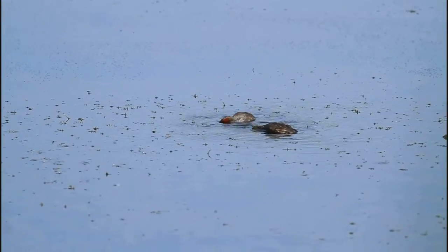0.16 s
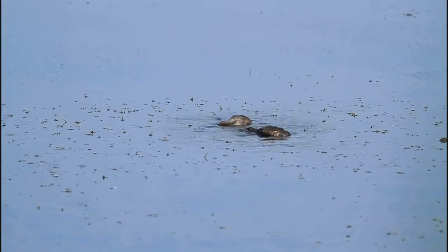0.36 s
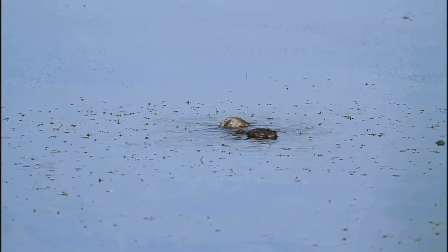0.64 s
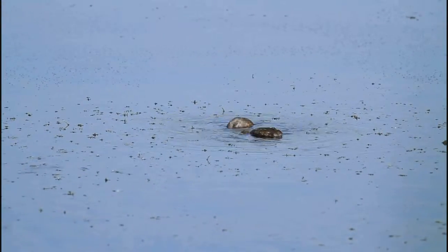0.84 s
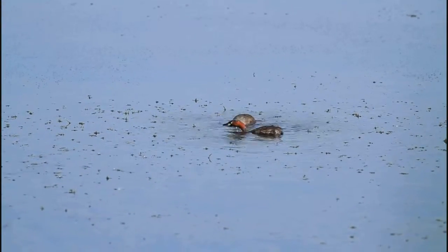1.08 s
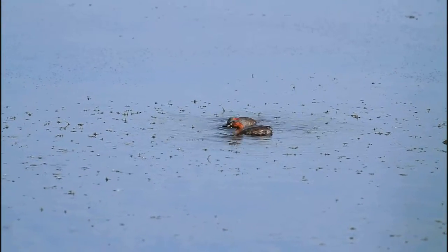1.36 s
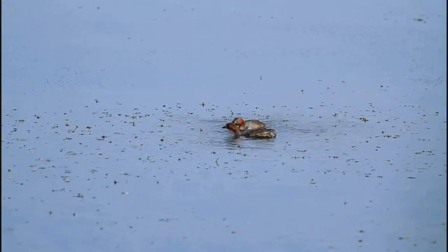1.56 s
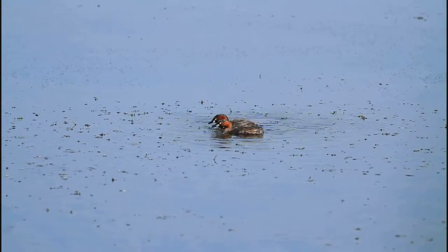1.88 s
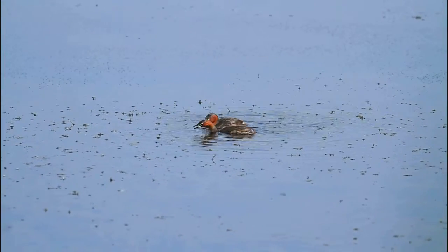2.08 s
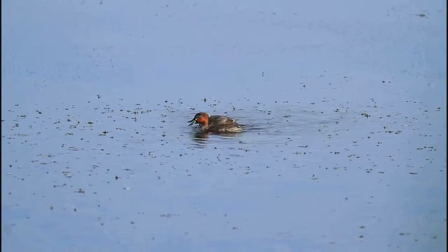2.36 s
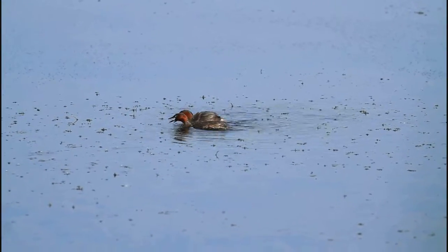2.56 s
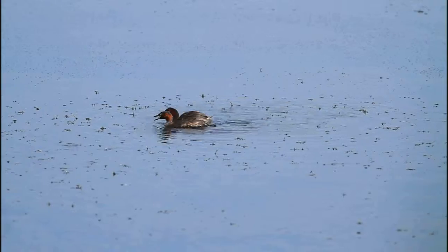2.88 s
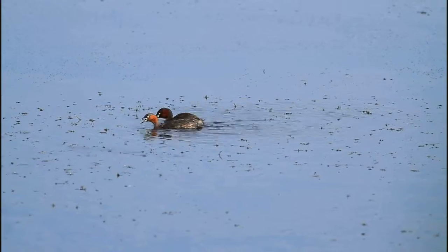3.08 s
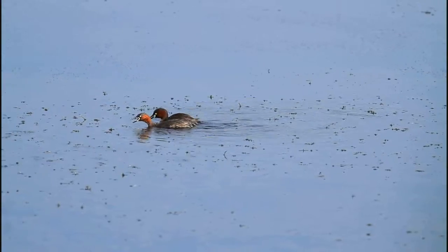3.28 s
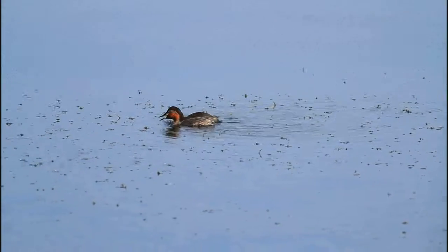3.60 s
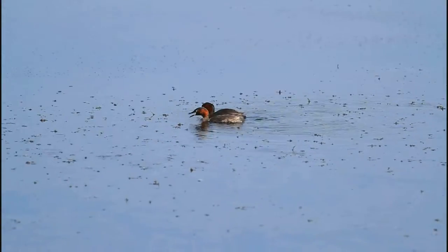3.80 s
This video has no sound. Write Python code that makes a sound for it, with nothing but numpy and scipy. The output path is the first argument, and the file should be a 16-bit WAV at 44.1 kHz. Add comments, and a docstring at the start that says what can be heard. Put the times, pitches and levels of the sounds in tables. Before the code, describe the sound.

Two little grebes burst into a fast rattling duet trill after quiet distant bird whistles.

```python
"""Two little grebes trill in a duet on a calm pond: short arched notes in alternation, led in by soft peeps.
Each note is a stack of harmonics on an arch of pitch, coloured by the throat. The lower bird is clean;
the higher one is rasped by a second tone, or flips up into a thin squeak.
Far birds whistle as gliding sines, a distant engine hums as steady tones under coloured noise for the air,
and a few dull bumps are short low pulses. Decaying noise makes the diffuse answer of the banks."""
import sys
import numpy as np
from scipy import signal
from scipy.fft import rfft, irfft, next_fast_len
from scipy.io import wavfile
from scipy.ndimage import map_coordinates

SR = 44100
rng = np.random.default_rng(int(sys.argv[2]) if len(sys.argv) > 2 else 0)


def int16_out(signal):
    """Quantize to a 16-bit WAV file."""
    q = np.round(np.clip(np.atleast_2d(signal).T, -1, 1) * 32767)
    wavfile.write(sys.argv[1], SR, q.astype(np.int16))


N = 173754
TOP_HZ = 15750  # band limit
TRILL_START_S = 2.1
BLUR_RAD = 0.58  # phase noise that frays the treble overtones

# treble level of both birds through the trill, before each note's own changes: t/s, level/dB
TREBLE_COURSE = [(2.05, -40.5), (2.2, -32.5), (2.4, -29.5), (2.52, -36), (2.9, -36), (3.65, -33.5),
                 (3.85, -39.5)]


def amp(db):
    """Decibels to gain."""
    return 10 ** (np.asarray(db) / 20)


def unit(x):
    """Scaled to rms 1."""
    return x / np.sqrt(np.mean(x ** 2) + 1e-20)


def along(points, hz):
    """Reads (Hz, value) points on a log frequency axis."""
    f, v = np.transpose(points)
    return np.interp(np.log(hz + 1), np.log(f + 1), v)


def wobble(rate, size=N):
    """A smooth random curve of about rms 1, with rate knots a second."""
    knots = rng.standard_normal(size + 4)
    position = np.arange(size) * rate / SR
    return map_coordinates(knots, [position], order=3, prefilter=False) * np.sqrt(2)


def filtered(x, response):
    """Multiplies the spectrum of x by a response of frequency."""
    m = next_fast_len(N + SR // 2)
    hz = np.fft.rfftfreq(m, 1 / SR)
    return irfft(rfft(x, m) * response(hz), m)[:N]


def noise(spectrum):
    """Coloured noise of rms 1."""
    return unit(filtered(rng.standard_normal(N), lambda hz: amp(along(spectrum, hz))))


def add(track, s, sound):
    """Mixes a sound in, centred on time s."""
    i = round(s * SR) - len(sound) // 2
    track[i:i + len(sound)] += sound[:max(N - i, 0)]


def background():
    """Coloured noise for open air, an engine's fading hum, a thin insect-like band and a faint rustle."""
    # engine partials, rms level at the start: f/Hz, level/dB
    hum_partials = [(99, -42), (198.5, -49), (231.3, -51.5), (265, -53.5), (296.5, -51)]
    # colour of the air, relative: f/Hz, level/dB
    air_colour = [(25, -20), (45, -3.5), (125, -2.5), (200, -8), (330, -5), (500, -17.5), (800, -14),
                  (1300, -21.5), (3200, -25.5), (3700, -32), (4600, -29), (5600, -34), (15500, -40.5)]
    # colour of the thin steady band, relative: f/Hz, level/dB
    insect_colour = [(2750, -22), (3320, -4), (3700, -35.5)]
    hum_fade_db_per_s = 2.5
    rustle_s, rustle_db = 1.7, -54
    t = np.arange(N) / SR
    hum = np.zeros(N)
    for hz, db in hum_partials:
        level_db = db - hum_fade_db_per_s * t + 0.54 * wobble(6.92)
        hum += np.sqrt(2) * amp(level_db) * np.sin(2 * np.pi * hz * t + 0.51 * wobble(8.24))
    drift_db = .5 * wobble(10)
    air = amp(-42 + drift_db) * noise(air_colour)
    rustle = amp(rustle_db) * np.exp(-((t - rustle_s) / .012) ** 2) * rng.standard_normal(N)
    insects = amp(-61.0) * noise(insect_colour)
    return hum + air + rustle + insects


def bumps():
    """Dull bumps as short low-pitched pulses, and one harder knock as a decaying burst of noise."""
    # dull bumps: t/s, peak level/dB
    bump_rows = [(1.843, -29), (1.883, -20), (2.794, -24), (2.981, -27), (3.171, -28), (3.478, -30)]
    # hard knock, rms level at its onset: t/s, level/dB
    knock_rows = [(2.789, -26.5)]
    bump_hz = 103
    out, t = np.zeros(N), np.arange(-SR // 10, SR // 10) / SR
    pulse = np.cos(2 * np.pi * bump_hz * t) * np.exp(-np.abs(t * bump_hz / 0.55) ** 3.1)
    for s, db in bump_rows:
        add(out, s, amp(db) * pulse)
    for s, db in knock_rows:
        age = np.arange(N) / SR - s
        decay = (age > 0) * amp(-60 * np.abs(age) / 0.036)  # 60 dB down in 36 ms
        out += amp(db) * decay * noise([(150, 1), (450, -3.5), (900, -32), (3000, -48)])
    return out


def far_birds():
    """Slurred whistles: gliding sines with a weak undertone at half the pitch and an overtone at 3/2."""
    # one table per whistle or chirp, level of the main tone: t/s, f/Hz, level/dB
    whistle_paths = [
        [(0.0, 4400, -53), (.05, 5140, -50), (.1, 4145, -48.5), (.16, 3603, -45.5), (.19, 3985, -48.5),
         (.22, 3630, -60)],
        [(.52, 4200, -60), (.61, 5300, -54.5), (.675, 7180, -57)],
        [(1.015, 3900, -55), (1.04, 5000, -48), (1.065, 4950, -50), (1.09, 4220, -49), (1.14, 3800, -56),
         (1.205, 3850, -53.5), (1.25, 3500, -54)],
        [(1.727, 3620, -56), (1.747, 3280, -57)],
        [(1.922, 3170, -47), (1.95, 3500, -51)],
    ]
    out, t = np.zeros(N), np.arange(N) / SR
    for rows in whistle_paths:
        s, hz, db = np.transpose(rows)
        pitch = np.interp(t, s, hz) * (1 + 0.012 * wobble(300))
        phase = 2 * np.pi * np.cumsum(pitch) / SR
        gate = np.clip(np.minimum(t - s[0], s[-1] - t) / 0.0051, 0, 1)
        flutter_db = 3 * wobble(90)
        tone = np.sin(phase) + amp(-7.5) * np.sin(phase / 2) + amp(-17) * np.sin(3 * phase / 2)
        out += gate * amp(np.interp(t, s, db) + flutter_db) * tone
    return out


def bank(x, delay_s):
    """The diffuse answer of the banks: x convolved with decaying noise; the lows die first."""
    # time to decay by 60 dB: f/Hz, t60/s
    decay_times = [(300, 0.13), (3000, 0.52), (6000, 0.59), (14000, 0.49)]
    hz, t, z = signal.stft(rng.standard_normal(SR // 2), SR, nperseg=256)
    decay = amp(-60 * t / along(decay_times, hz)[:, None])
    tail = signal.istft(z * decay, SR, nperseg=256)[1]
    delayed = np.pad(x, (int(delay_s * SR), 0))
    return signal.fftconvolve(delayed, tail / np.linalg.norm(tail))[:N]


def note(hz, level_db, upper_db, treble_db, shape, jitter, second_db=-100, mid_treble_db=0,
         glide=0, swell_db=0, fade_db_per_s=0, top_shift=1, blur=0):
    """One arch of pitch: its harmonics sweep through the throat's resonances; a second tone makes it rasp."""
    # throat response of both birds: f/Hz, level/dB
    throat = [(800, -9.5), (1450, -11), (1800, -7.5), (2300, 1), (2900, -3), (3400, 1.5), (4200, 5.5),
              (4650, -2.5), (5300, -15.5), (6800, -17), (8000, -24.5), (10300, -26), (12400, -17.5),
              (14000, -22), (15500, -43)]
    # where the upper resonance is lifted: f/Hz, weight
    upper_zone = [(3100, 0), (3700, 1), (5050, 1), (5500, 0)]
    # where the treble settings take hold: f/Hz, weight
    treble_zone = [(5050, 0), (5500, 1)]
    # where the top resonance is retuned: f/Hz, weight
    top_zone = [(8000, 0), (11000, 1)]
    arch_power, skew = 2.42, 0.352  # roundness of the arch; its random lopsidedness
    scatter_db, sag_loss_db = 3, 8  # treble overtone balance per note; loss per unit of pitch sag
    swell_s, blur_rate = 0.0058, 1394  # width of the crest's swell; phase noise knots a second
    # second tone: ratio to the pitch, scatter of that ratio, how the two modulate each other
    second_ratio, second_spread, second_depth, second_pull = 2.71, 0.0617, 0.1, 0.17

    rise, fall, drop_in, drop_out, before, after = shape
    t = np.arange(-SR // 32, SR // 32) / SR
    size = len(t)
    lean = np.exp(skew * rng.uniform(-1.043, 1))
    sag_in = lean * drop_in * np.abs(t / rise) ** arch_power
    sag_out = drop_out / lean * np.abs(t / fall) ** arch_power
    sag = np.minimum(np.where(t < 0, sag_in, sag_out), .5)
    f0 = hz * np.exp(glide * t - sag + jitter * wobble(1454, size))

    swell = swell_db * (np.exp(-(t / swell_s) ** 2) - .7)
    effort_db = swell - sag_loss_db * sag - fade_db_per_s * t
    gate = amp(effort_db) / (1 + np.abs(t / np.where(t < 0, before, after)) ** 8)

    phase = 2 * np.pi * (np.cumsum(f0) / SR + rng.random())
    ratio = second_ratio + second_spread * rng.standard_normal()
    second = ratio * phase + 2 * np.pi * rng.random() + .5 * wobble(424, size)

    k = np.arange(1, 15)[:, None]  # harmonic numbers
    f = k * f0
    treble, top = along(treble_zone, f), along(top_zone, f)
    lifts = upper_db * along(upper_zone, f)
    lifts += (treble_db + scatter_db * rng.standard_normal(k.shape)) * treble
    lifts += mid_treble_db * (treble - top)
    gains = amp(along(throat, f / top_shift ** top) + lifts) * (f < TOP_HZ)

    beat = np.sin(3 * phase - second)
    pulled = phase + second_pull * min(amp(second_db), 1) * beat
    smear = blur * treble * np.array([wobble(blur_rate, size) for _ in k])
    stack = (gains * np.sin(k * pulled + smear)).sum(0)
    side = amp(second_db) * np.sin(second) * (1 + second_depth * np.cos(phase))
    flutter_db = 1.5 * wobble(400, size)
    return np.sqrt(2) * amp(level_db + flutter_db) * gate * (stack + side)


def peeps():
    """Soft gliding notes around the start of the trill, one with a bright flick."""
    # middle, pitch, half length, level before the throat, brightness, relative glide:
    # t/s, f/Hz, half/s, level/dB, bright/dB, glide/(1/s)
    peep_rows = [(1.82, 2120, 0.01, -45.5, -11, -5.5), (1.870, 1990, 0.015, -40, -10, -1),
                 (1.9, 2243, 0.008, -39, -3.5, 2.5), (1.911, 2518, 0.0053, -42.5, 10.5, 0.5),
                 (1.93, 2124, 0.011, -40, -16, -4.5), (2.074, 2060, .004, -34.5, -12, 2)]
    out = np.zeros(N)
    for s, hz, half, db, bright_db, glide in peep_rows:
        shape = (half, half, .03, .03, half, half)
        add(out, s, note(hz, db, bright_db - 9, bright_db, shape, jitter=0.011, glide=glide))
    return out


def higher_grebe():
    """Answers in the gaps, with a rasping two-tone arch or a run-up that breaks into a squeak."""
    # crest, pitch, level before the throat, lift of the upper resonance, second tone relative to the level:
    # t/s, f/Hz, level/dB, upper/dB, second/dB
    rasp_rows = [(2.268,1535,-36,3,5.5), (2.327,1601,-35,5.5,6), (2.386,1623,-37.5,10.5,0),
                 (2.445,1621,-35.5,8,0), (2.502,1596,-40.5,9,-2), (2.561,1540,-35,5,2),
                 (2.619,1620,-36,-8,2.5), (2.909,1558,-37.5,7,2), (2.971,1581,-38,10,-15),
                 (3.027,1582,-36,4,1.5), (3.085,1562,-34,2,-1), (3.144,1513,-33,-1.5,-2),
                 (3.198,1532,-35,-4,0.5), (3.436,1513,-34,-4.5,-2.5), (3.498,1492,-31.5,-3,-7),
                 (3.558,1516,-33.5,-2,-5), (3.614,1506,-33.5,-2.5,0), (3.675,1537,-34.5,1,4),
                 (3.736,1540,-35,0.5,-3), (3.796,1500,-31,0,-7), (3.856,1524,-33.5,-4,-4),
                 (3.915,1535,-33,0,0)]
    # notes in the top register, level before the throat: t/s, f/Hz, level/dB, upper/dB
    squeak_rows = [(2.022,2340,-42,-4), (2.084,2480,-43,16), (2.151,2460,-36,11), (2.210,2466,-34.5,8.5),
                   (2.684,2485,-36.5,7), (2.739,2453,-36,9.5), (2.794,2428,-37.5,11.5),
                   (2.858,2484,-35.5,7), (3.211,2390,-40.5,-12), (3.263,2340,-35,-1),
                   (3.322,2320,-34.5,4.5), (3.383,2330,-34,4)]
    # arches, each: rise/s, fall/s, log pitch drop at start and end (before the random lean),
    # time before/s and after/s the crest where the gate halves
    rasp_shape = (0.014, 0.0151, 0.17, 0.083, 0.012, 0.011)
    squeak_shape = (0.01196, 0.0078, 0.0046, 0.028, 0.0088, 0.0069)
    run_up_shape = (0.012, 0.011, 0.269, .02, 0.014, 0.00076)
    run_up_s, run_up_ratio, run_up_db = .009, 0.56, -4  # low climb before a squeak, relative to it
    vigour_s, punch_db_per_s = 0.77, 260  # while fresh, notes start hard and fade
    top_tired, top_lift, top_squeak = 0.96, .13, 1.24  # top resonance: tired, rise with vigour, in a squeak
    out = np.zeros(N)
    for s, hz, db, upper_db, second_db in rasp_rows:
        vigour = np.exp(-((s - TRILL_START_S) / vigour_s) ** 2)
        treble_db = np.interp(s, *np.transpose(TREBLE_COURSE)) - db
        add(out, s, note(hz, db, upper_db, treble_db, rasp_shape, jitter=0.0075, second_db=second_db,
                         mid_treble_db=-6.5, fade_db_per_s=punch_db_per_s * vigour,
                         top_shift=top_tired + top_lift * vigour, blur=BLUR_RAD))
    for s, hz, db, upper_db in squeak_rows:
        run_up = note(hz * run_up_ratio, db + run_up_db, 1.2, 0, run_up_shape,
                      jitter=0.005, second_db=4, blur=BLUR_RAD)
        add(out, s - run_up_s, run_up)
        add(out, s, note(hz, db, upper_db, 4.5, squeak_shape, jitter=0.0023, top_shift=top_squeak))
    return out


def lower_grebe():
    """Clean arched notes, about seventeen a second; taut ones swell at the crest, slack ones stay flat and dull."""
    # crest, pitch, level before the throat, lift of the upper resonance: t/s, f/Hz, level/dB, upper/dB
    low_rows = [(2.052,1447,-29,-7), (2.116,1470,-30,-5), (2.182,1400,-32.5,-4), (2.241,1431,-30.5,-3.5),
                (2.302,1400,-30,-4.5), (2.36,1406,-32,-7.5), (2.418,1390,-33,-7.5), (2.475,1403,-33.5,-3.5),
                (2.535,1412,-33,1.5), (2.592,1386,-34.5,3), (2.649,1376,-36.5,0.5), (2.708,1388,-34,-3.5),
                (2.766,1333,-36,-4), (2.826,1335,-38,-2), (2.881,1336,-36,-3.5), (2.942,1357,-37.5,0.5),
                (3.001,1330,-39,0), (3.06,1323,-38.5,-8), (3.117,1210,-41,-4), (3.176,1293,-39.5,-2.5),
                (3.234,1340,-41,3.5), (3.293,1298,-46.5,12), (3.355,1287,-46.5,9), (3.413,1152,-40,-6),
                (3.471,1153,-39,-2.5), (3.528,1143,-37.5,-7), (3.585,1223,-41,-8), (3.645,1387,-34,-3.5),
                (3.708,1309,-40,2.5), (3.766,1297,-43,2), (3.826,1180,-41,-8), (3.887,1133,-40.5,-10)]
    # arch: rise/s, fall/s, log pitch drop at start and end (before the random lean),
    # time before/s and after/s the crest where the gate halves
    low_shape = (0.012, 0.0139, .21, 0.156, 0.012, 0.011)
    usual_hz, treble_db_per_octave = 1495, 24  # notes below the usual pitch are duller
    usual_swell_db, swell_db_per_octave = 7.5, 41
    mid_treble_db_per_s = 1.5  # about 5.5-8 kHz gains on the rest of the treble
    out = np.zeros(N)
    for s, hz, db, upper_db in low_rows:
        age, octaves = s - TRILL_START_S, np.log2(hz / usual_hz)
        treble_db = np.interp(s, *np.transpose(TREBLE_COURSE)) - db + treble_db_per_octave * octaves
        treble_db -= age  # 1 dB a second
        swell_db = max(usual_swell_db + swell_db_per_octave * octaves, 0)
        add(out, s, note(hz, db, upper_db, treble_db, low_shape, jitter=0.0041,
                         mid_treble_db=mid_treble_db_per_s * age, swell_db=swell_db, blur=BLUR_RAD))
    return out


def scene():
    """The banks soften the gaps of the trill and trail behind the far birds."""
    pair = lower_grebe() + higher_grebe() + peeps()
    far = far_birds()
    near_mix = pair + amp(-10.5) * bank(pair, .006)
    far_mix = far + amp(-2) * bank(far, 0.007)
    return (near_mix + far_mix + bumps() + background())[None]


def record(dry):
    """Nothing is kept above the band limit."""
    return filtered(dry[0], lambda hz: hz < TOP_HZ)[None]


dry = scene()
out = record(dry)
int16_out(out)
```